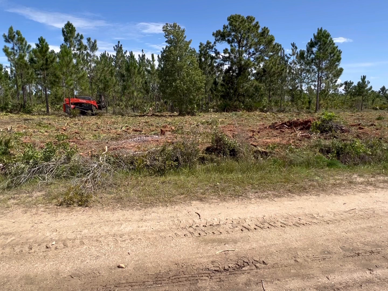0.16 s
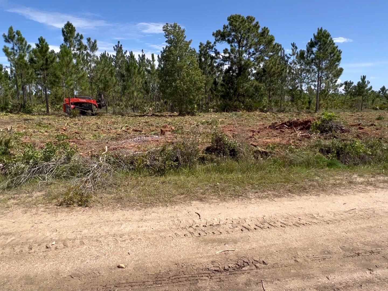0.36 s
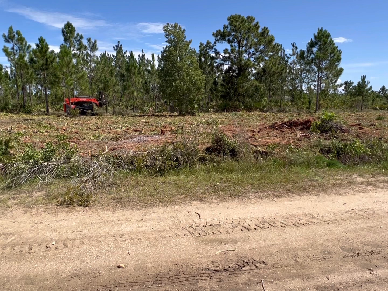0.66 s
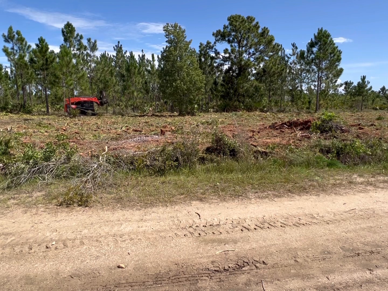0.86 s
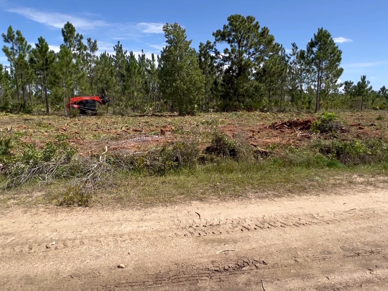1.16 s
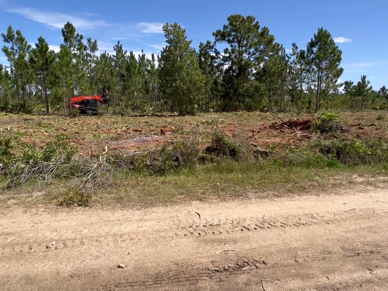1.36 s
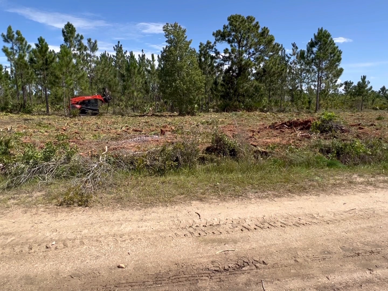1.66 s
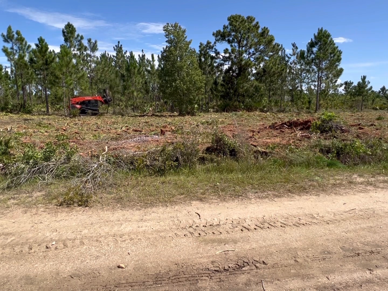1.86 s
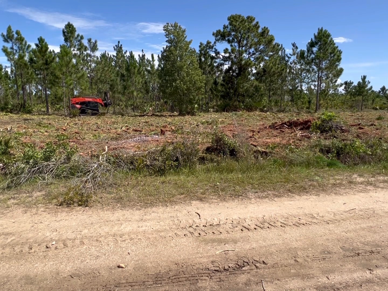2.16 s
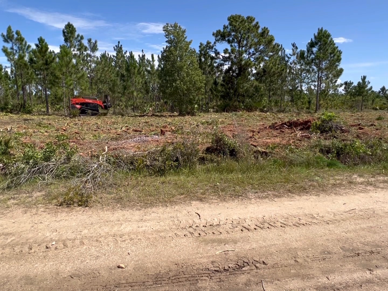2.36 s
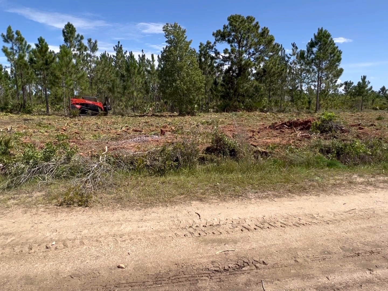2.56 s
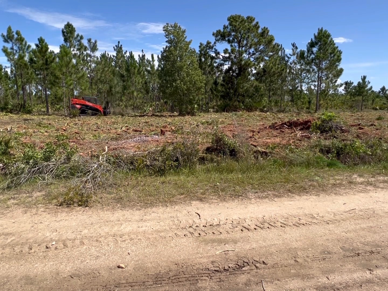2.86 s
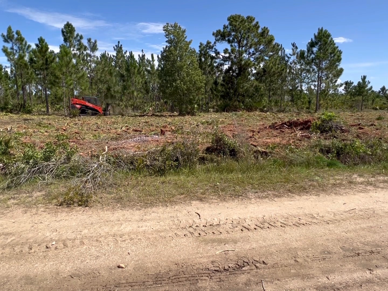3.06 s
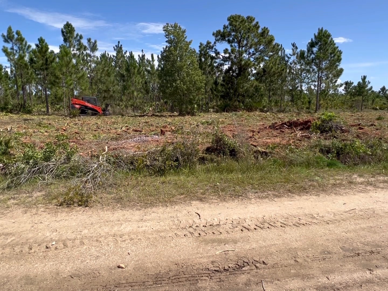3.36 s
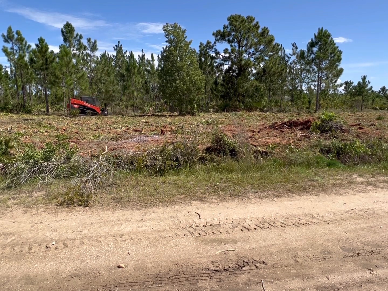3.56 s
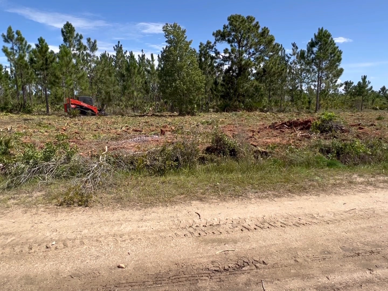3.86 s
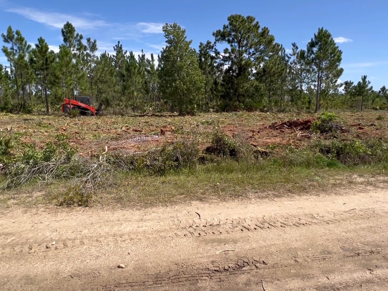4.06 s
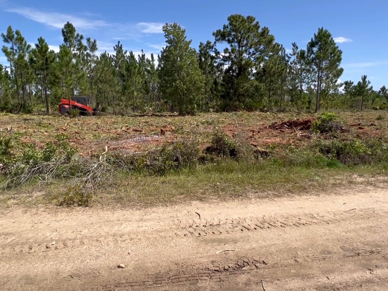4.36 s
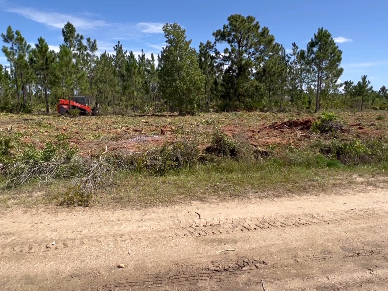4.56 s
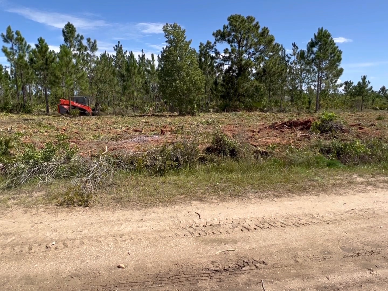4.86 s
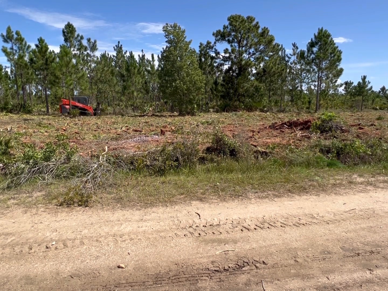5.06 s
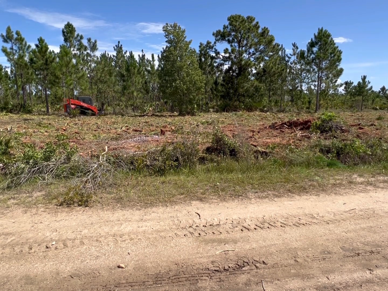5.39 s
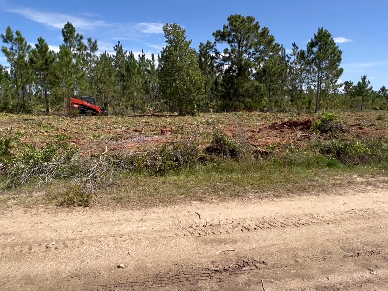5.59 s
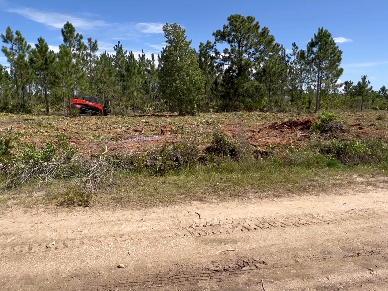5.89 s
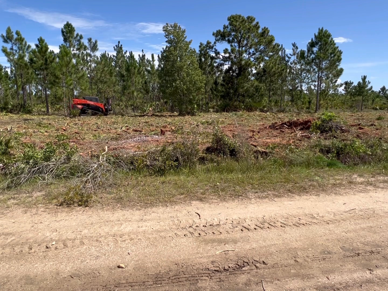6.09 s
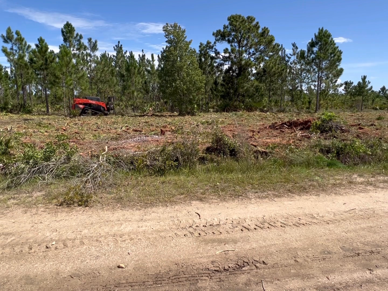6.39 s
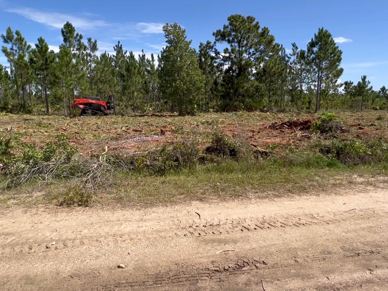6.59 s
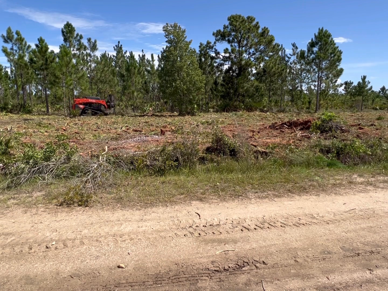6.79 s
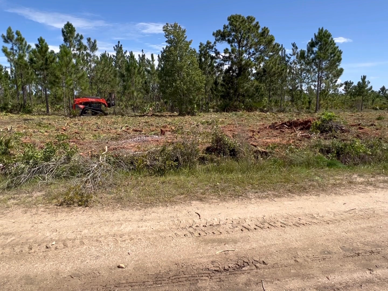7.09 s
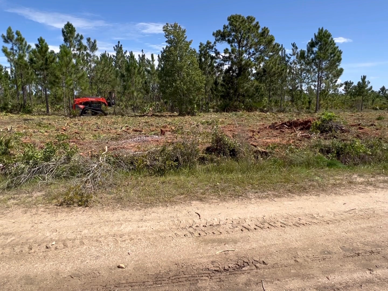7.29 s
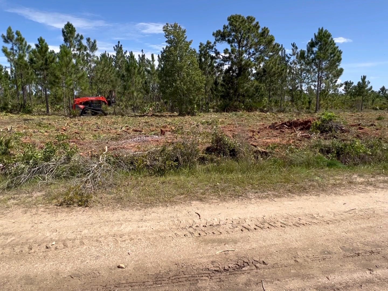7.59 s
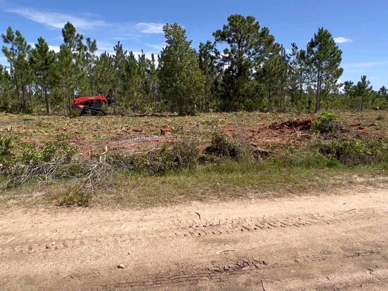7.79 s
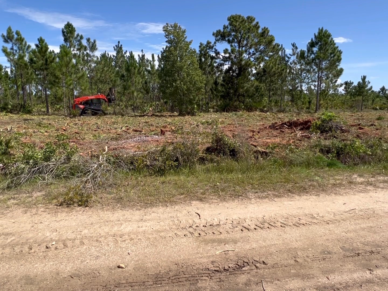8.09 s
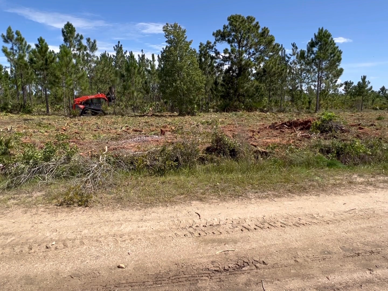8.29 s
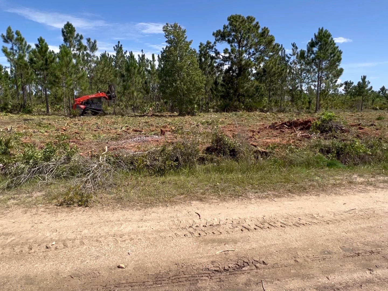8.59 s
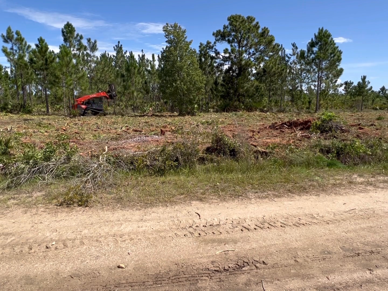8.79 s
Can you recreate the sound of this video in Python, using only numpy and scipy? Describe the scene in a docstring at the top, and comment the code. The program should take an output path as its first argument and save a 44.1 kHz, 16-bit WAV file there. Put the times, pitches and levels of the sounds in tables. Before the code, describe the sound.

A throbbing diesel drone continues throughout, heard from a distance in stereo. Brush crackles and knocks against a steel hood, building to a harsh tearing burst with brief howls, then falls back to a quieter engine with a wavering motor whine. Later, dull metallic track clanks and steady woody snaps resume. Low uneven wind gusts buffet the microphone in the first half, with few afterwards.

```python
"""Cleared lot: a tracked forestry mulcher works some way off to the left, heard at two microphone ports.
Diesel: tones at multiples of the firing rate over a throbbing noise drone. Drum: hum and howls on turn orders.
Brush: shaped noise for shredding, bursts for snaps. Tracks clank as decaying modes and squeak as narrow noise.
Fluttering tones make the whines and a low hum. Wind rumbles as low noise, mostly different at each port.
"""
import sys
import numpy as np
from scipy import signal
from scipy.fft import rfft, irfft
from scipy.io import wavfile
from scipy.ndimage import uniform_filter1d

SR = 44100
rng = np.random.default_rng(int(sys.argv[2]) if len(sys.argv) > 2 else 0)


def store_wav(level_fs):
    """Save 16-bit WAV to argv[1]."""
    pcm = np.round(np.clip(np.atleast_2d(level_fs), -1, 1) * 32767)
    wavfile.write(sys.argv[1], SR, pcm.T.astype(np.int16))


N = 394254
T = np.arange(N) / SR
HZ = np.fft.rfftfreq(N, 1 / SR)

# Engine: t/s, firing rate f/Hz, firing-tone level/dB
THROTTLE = [(0, 84.2, -42), (.7, 82.2, -36.5), (1.35, 82.3, -33), (1.6, 84.1, -33), (2.9, 83.7, -31),
            (3.4, 81, -40), (4.4, 77, -40), (5.1, 75.9, -65), (6.25, 81.8, -34.5), (7.2, 81.55, -31.5),
            (8.94, 81.6, -30)]
# Exhaust lines: multiple of firing rate, level/dB (firing tone itself at +2.5)
EXHAUST_ORDERS = [(.75, -7), (1, 2.5), (1.25, -12), (1.5, -9.5), (2, -12), (2.75, -18), (3.75, -32),
                  (4.75, -21.5)]


def diesel():
    """Exhaust tones at multiples of the four-cylinder firing rate."""
    firing_hz, level_db = curves(THROTTLE)
    tones = stack(firing_hz, EXHAUST_ORDERS, flutter=0.31, flutter_hz=9.1)
    return amp(level_db - 2.5) * tones  # offsets the +2.5 dB of order 1


# Exhaust and chassis roar spectrum: f/Hz, relative density/dB
DRONE_COLOUR = [(40, -42), (65, -1.5), (100, -2), (150, 1.5), (225, -1.5), (262, -8.5), (305, -14.5),
                (375, -14.5), (470, -21.5), (800, -17.5), (2000, -75)]
DRONE_DB, DRONE_SWELL_DB = -31, 2  # mean level, rms drift


def drone():
    """Rough low roar of exhaust and chassis, throbbing at the firing rate."""
    firing_hz = curves(THROTTLE)[0]
    throb = 1 + 0.54 * np.cos(2 * np.pi * np.cumsum(firing_hz) / SR)
    roar = unit(colour(hiss() * throb, DRONE_COLOUR))
    return amp(DRONE_DB + DRONE_SWELL_DB * wander(1.27)) * roar


# Drum, slowed by the ground: t/s, turning rate f/Hz
DRUM_SPEED = [(0, 38.4), (1.1, 37), (2.6, 37.6), (2.72, 37.1), (2.88, 36.3), (3.1, 36.1), (3.25, 31.3),
              (4.5, 32), (7, 38.4), (8.94, 37.8)]
# Drum hum lines: multiple of turning rate, level/dB relative to the hum
DRUM_ORDERS = [(3, -13), (6, -0.5), (8, -33), (10, -24)]
# Howls as teeth dig in: peak t/s, rise/s, fall/s, multiple of turning rate, level/dB
HOWLS = [(0.068, 0.17, 0.36, 6, -40), (2.71, .07, .19, 6, -23.5), (2.945, .1, .06, 6, -19.5),
         (3.09, .04, .06, 6, -30), (2.87, .24, .08, 7, -25.5), (3.045, .03, .03, 7, -30.5),
         (3.15, .03, .04, 7, -35.5)]
DRUM_HUM_DB, DRUM_DEEP_DB = -44, 3.5  # hum gain, gain added at full depth in soil


def drum():
    """Turn orders hum, louder in soil; two orders howl as the teeth dig in."""
    turns_hz = curves(DRUM_SPEED)[0]
    depth = curves(DEPTH)[0]
    hum = stack(turns_hz, DRUM_ORDERS, flutter=0.28, flutter_hz=2.7)
    out = amp(DRUM_HUM_DB + DRUM_DEEP_DB * depth) * hum
    for order in sorted({round(row[3]) for row in HOWLS}):
        level = sum(amp(db) * swell(s, rise, fall)
                    for s, rise, fall, k, db in HOWLS if round(k) == order)
        out += level * stack(turns_hz, [(order, 0)], flutter=0.07, flutter_hz=11)
    return out


# Chips on the hood, spectrum: f/Hz, relative density/dB
HOOD_COLOUR = [(200, -29), (380, -7.5), (480, -5.5), (650, -0.5), (800, -0.5), (950, -0.5), (1130, -1.5),
               (1400, -12), (2050, -8), (2500, -24), (4000, -79)]
# Wood grinding, spectrum: f/Hz, relative density/dB
GRIND_COLOUR = [(800, -16), (1300, -0.5), (1650, 2), (1970, 0.5), (2130, 2.5), (2320, 0), (2600, 0),
                (3000, -12.5), (4500, -62)]
# Brush tearing, spectrum: f/Hz, relative density/dB
SHRED_COLOUR = [(1500, -22), (2800, 5.5), (3500, 3), (4300, 1), (5200, -1), (6500, -4), (7600, -4.5),
                (10000, -28)]
# Chip spray, spectrum: f/Hz, relative density/dB
CHIP_COLOUR = [(3000, -20), (6000, -3), (7600, 0), (9000, -1.5), (10200, -6), (12000, -2), (13500, -6),
               (16000, -9)]
# Fine chips flying clear of the hood: t/s, level/dB before the feed drift
SPRAY = [(0, -67), (0.6, -61), (0.95, -50.5), (2.4, -45.5), (2.65, -38), (3.1, -42.5), (3.3, -45.5),
         (4.0, -53), (4.55, -54), (5.0, -63), (5.65, -55.5), (6.3, -68.5), (6.85, -54), (8.94, -53.5)]
# Hiss bursts as the head meets the ground: peak t/s, rise/s, fall/s, gain on the tearing/dB
SCRAPES = [(2.59, 0.13, 0.12, 4), (3.11, 0.25, 0.07, 1.8)]


def shredding():
    """Teeth tear brush once a turn; wood grinds, chips rattle the hood and spray out."""
    turns_hz = curves(DRUM_SPEED)[0]
    bite = 1 + 0.024 * np.cos(2 * np.pi * np.cumsum(turns_hz) / SR)
    hit_gain = amp(3.3 * np.minimum(rng.exponential(1, N), 4.5))
    hits = (rng.random(N) < 420 / SR) * hit_gain  # 420 hits/s
    grain_power = signal.lfilter([1], [1, -np.exp(-1 / (0.0034 * SR))], hits ** 2)
    grains = unit(np.sqrt(grain_power))

    rattle = hiss() * bite * (1 + 0.25 * grains)
    hood = unit(colour(rattle, HOOD_COLOUR)) + 0.32 * panels(rattle)
    hood = patchy(hood, depth_db=0.57, size=(2, 14))
    grind = colour(hiss() * bite * (1 + 0.11 * grains), GRIND_COLOUR)
    grind = patchy(grind, depth_db=1.5, size=(2, 12))
    shred = colour(hiss() * bite * (1 + 0.1 * grains), SHRED_COLOUR)
    shred = patchy(shred, depth_db=0.9, size=(9, 5))
    chips = unit(colour(hiss() * (1 + 0.96 * grains), CHIP_COLOUR))

    feed = amp(0.7 * wander(3.8))  # brush enters in clumps
    scrape = amp(sum(db * swell(s, rise, fall) for s, rise, fall, db in SCRAPES))
    clatter = effort(level_db=-32.5, per_load=0.7, deep_db=-4.5) * hood
    grinding = effort(level_db=-37, per_load=1.0, deep_db=2.2) * grind
    tearing = scrape * effort(level_db=-41, per_load=0.72, deep_db=1.8) * shred
    spray = amp(curves(SPRAY)[0]) * chips
    return clatter + grinding + feed * (tearing + spray)


# Steel hood panels: f/Hz, width/Hz, mean level/dB before normalising
HOOD_MODES = [(670, 13, -19), (810, 16, 1), (973, 34, -0.5), (1151, 27, 4), (1304, 29, 2.5), (1460, 40, -2)]
PANEL_SWING_DB, PANEL_SWING_HZ = 3.5, 2.1  # rms and rate of each panel's drift


def panels(rattle):
    """Hood panels take turns to ring as chips land on one or another; rms 1."""
    out = 0
    for hz, width_hz, db in HOOD_MODES:
        share = amp(db + PANEL_SWING_DB * wander(PANEL_SWING_HZ))
        out = out + share * np.sqrt(width_hz) * ring(rattle, [(hz, width_hz, 0)])
    return unit(out)


# Stem crack spectrum, also the swishes: f/Hz, relative density/dB
CRACK_COLOUR = [(1200, -18), (2050, 2), (2800, -9), (3700, -.5), (4250, -1), (5000, 1), (6600, -4),
                (7700, -20), (8800, -16), (12000, -19), (16000, -27)]
# Stem knock on the hood, spectrum: f/Hz, relative density/dB
KNOCK_COLOUR = [(250, -22), (480, -3), (720, 4), (1100, 0), (1450, -5), (2000, -.5), (2400, -6),
                (3000, -22), (6000, -40)]
# Bright dry ticks: t/s, relative level/dB
TICKS = [(0.26, -50), (0.716, -41), (0.8314, -41), (1.324, -34), (1.6532, -34), (1.665, -33),
         (2.8726, -30.5), (7.4104, -40.5), (7.466, -36)]
# Tick spectrum: f/Hz, relative density/dB
TICK_COLOUR = [(3000, -0.5), (8000, -3), (12000, -10), (16000, -2)]
# Brush swishing in the drum: peak t/s, rise/s, fall/s, level/dB
SWISHES = [(.28, .03, .08, -48), (.905, .03, .02, -44), (6.205, .012, .035, -46),
           (6.412, .006, .022, -44.5), (6.56, .05, .09, -51)]


def snapping():
    """Stems crack, splinter and knock on the hood; fine chips tick and brush swishes."""
    out = np.zeros((2, N))
    times, crack_db, knock_db = breaks()
    for s, db in zip(*splinters(times, crack_db)):
        crack = burst(CRACK_COLOUR, peak_s=.0012, tail_db=-13, tail_s=.013, spread_db=1.6)
        add(out, s, amp(db) * crack)
    for s, db in zip(times, knock_db):
        knock = burst(KNOCK_COLOUR, peak_s=.0018, tail_db=-9, tail_s=.016, spread_db=1.6)
        add(out, s, amp(db) * knock)
    tick = decays(*np.transpose(TICKS), fall_s=.0015, tail_db=-8, tail_s=0.014, rise_s=0.0001)
    ticks = amp(10.5) * colour(hiss() * tick, TICK_COLOUR)
    swish = sum(amp(db) * swell(s, rise, fall) for s, rise, fall, db in SWISHES)
    return out + ticks + swish * colour(hiss(), CRACK_COLOUR)


# Loud stem snaps, often in quick even runs: t/s, crack level/dB, hood knock level/dB
SNAPS = [(0.0355, -42.0, -38.0), (0.2029, -41.5, -44.0), (0.2598, -40.5, -43.0), (0.33, -42.5, -34.5),
         (0.717, -39.0, -42.5), (0.9507, -34.0, -33.0), (1.0245, -35.5, -28.5), (1.0989, -31.0, -26.5),
         (1.1737, -30.0, -28.5), (1.249, -26.5, -28.0), (1.3239, -26.5, -25.0), (1.3862, -31.0, -26.5),
         (1.4122, -35.5, -30.0), (1.4361, -36.5, -37.5), (1.4501, -29.0, -27.0), (1.475, -32.0, -29.0),
         (1.5109, -27.5, -31.0), (1.5525, -40.5, -33.0), (1.5618, -35.0, -33.5), (1.5873, -28.5, -29.0),
         (1.6531, -29.5, -37.5), (1.6605, -31.0, -26.5), (1.6665, -33.5, -29.5), (1.7145, -34.5, -32.0),
         (1.7399, -32.5, -26.5), (1.7639, -36.5, -26.0), (1.8407, -32.0, -24.5), (1.8475, -37.0, -29.5),
         (1.8911, -31.5, -28.5), (1.917, -28.0, -31.5), (1.9415, -30.0, -28.5), (1.9928, -29.0, -34.0),
         (2.0183, -29.0, -27.0), (2.0587, -38.0, -35.5), (2.0951, -36.0, -25.0), (2.1365, -35.0, -29.5),
         (2.1744, -36.0, -29.5), (2.3929, -34.5, -33.5), (2.4184, -35.5, -31.0), (2.4832, -34.5, -26.5),
         (6.2054, -45.0, -32.0), (6.6595, -43.0, -36.5), (6.7423, -43.0, -43.5), (6.7698, -35.5, -32.0),
         (6.8526, -41.5, -37.5), (6.8805, -43.0, -33.0), (6.9074, -38.0, -31.5), (6.9628, -36.0, -38.5),
         (7.0187, -39.0, -33.5), (7.0741, -35.0, -30.0), (7.1299, -35.0, -31.5), (7.1853, -33.0, -32.0),
         (7.2417, -27.5, -27.0), (7.2976, -34.5, -33.0), (7.3534, -31.5, -34.0), (7.4103, -31.5, -30.5),
         (7.4657, -32.0, -30.0), (7.5245, -40.5, -40.0), (7.551, -38.0, -32.5), (7.6363, -33.5, -24.0),
         (7.7216, -36.0, -24.5), (7.753, -40.5, -36.0), (7.8064, -38.0, -35.0), (7.8967, -38.5, -37.0),
         (7.9491, -37.0, -29.0), (8.0633, -37.0, -41.0), (8.2065, -38.0, -41.5), (8.3502, -38.0, -33.5),
         (8.4375, -40.5, -28.5), (8.5213, -40.0, -30.5), (8.6096, -37.5, -28.5), (8.6844, -38.5, -34.5),
         (8.7554, -40.5, -33.0), (8.8136, -38.5, -39.5)]
TWIGS_PER_S, TWIG_DB, TWIG_SPREAD_DB = 26, -42, 1.5  # at working load, head above soil
TWIG_KNOCK_DB = 9  # relative to the crack
IDLE_LOAD_DB = -48.5  # no twigs break below this


def breaks():
    """All breaks as (t/s, crack/dB, knock/dB): loud snaps plus random twigs that thicken with load."""
    load_db = curves(LOAD)[0] - WORKING_LOAD_DB
    clear = np.clip(1 - curves(DEPTH)[0], 0, 1) ** 2
    rate_hz = TWIGS_PER_S * (1 + load_db / (WORKING_LOAD_DB - IDLE_LOAD_DB)) * clear
    twig = rng.random(N) < rate_hz / SR
    twig_db = TWIG_DB + 0.5 * load_db + TWIG_SPREAD_DB * rng.standard_normal(N)
    twig_db = twig_db[twig]
    twigs = zip(T[twig], twig_db, twig_db + TWIG_KNOCK_DB)
    return np.transpose(list(SNAPS) + list(twigs))


SPLINTER_GAP_S, SPLINTER_DB, SPLINTER_SPREAD_DB = .006, -13, 4  # mean gap, offset, spread scale


def splinters(s, crack_db):
    """Each crack sets off two, 9 to 16 dB weaker, as the last fibres part; all as (t/s, level/dB)."""
    delays_s = np.cumsum(rng.exponential(SPLINTER_GAP_S, size=(len(s), 2)), axis=1)
    spread_db = SPLINTER_SPREAD_DB * rng.uniform(-0.69, 1, delays_s.shape)
    levels_db = crack_db[:, None] + SPLINTER_DB + spread_db
    return np.append(s, s[:, None] + delays_s), np.append(crack_db, levels_db)


# Drum load, wood being chewed: t/s, load level/dB
LOAD = [(0, -50), (0.7, -48), (1.05, -43), (1.45, -40), (1.8, -40.5), (2.15, -36.5), (2.42, -38),
        (2.75, -31.5), (3.05, -34.5), (3.27, -42.5), (3.55, -44.5), (4.0, -51.5), (5.3, -51), (6.45, -51),
        (7.3, -41.5), (8.15, -44.5), (8.94, -43)]
# Head in the soil: t/s, depth (0-1)
DEPTH = [(2.35, 0), (2.9, 0.96), (3.6, 0.92), (5, 0.7), (6.2, 0.05)]
WORKING_LOAD_DB = -40.5


def effort(level_db, per_load, deep_db):
    """Gain following load (dB per dB about working load) and soil depth (dB at full depth)."""
    load_db = curves(LOAD)[0] - WORKING_LOAD_DB
    return amp(level_db + per_load * load_db + deep_db * curves(DEPTH)[0])


# Track link drops: t/s, relative level/dB
CLANKS = [(6.205, -39), (6.435, -39.5), (6.604, -40), (6.768, -42), (6.876, -39), (7.047, -40),
          (7.215, -39), (8.143, -42.5), (8.47, -42), (8.522, -39), (8.78, -42.5)]
# Link modes: f/Hz, relative level/dB, t60/s
LINK_MODES = [(670, -18, 0.16), (1052, -19, 0.085), (1120, 5, 0.26), (1320, -3.5, 0.27), (1690, -3.5, 0.21)]


def tracks():
    """Steel links drop onto rollers: decaying modes, detuned per drop, with a chattering level."""
    out, t = np.zeros(N), np.arange(SR // 3) / SR
    for s, db in CLANKS:
        clank = 0
        for hz, mode_db, t60_s in LINK_MODES:
            decay = amp(db + 3.5 + mode_db - 60 * t / t60_s)
            cycles = hz * rng.normal(1, 0.0085) * t + rng.random()
            clank = clank + decay * np.sin(2 * np.pi * cycles)
        part = out[round(s * SR):][:len(t)]
        part += (clank * (1 - np.exp(-t / 0.0013)))[:len(part)]
    return out * unit(1 + 0.6 * wander(45))


# Thin high squeaks: t/s, level/dB, length/s
SQUEAKS = [(1.66, -52, .07), (1.95, -54, .08), (2.45, -50, .06), (5.65, -63, .3), (6.43, -47, .13),
           (7.46, -55, .1)]
# Squeak resonance, first row; the other rows are too weak to hear: f/Hz, width/Hz, relative level/dB
SQUEAK_MODES = [(12650, 290, 32), (12900, 140, -24), (14600, 130, -44)]


def squeaks():
    """Thin, very high squeaks: noise in one narrow resonance near 12.65 kHz."""
    level = 0
    for s, db, length_s in SQUEAKS:
        progress = np.clip((T - s) / length_s, 0, 1)
        level = level + amp(db) * np.sin(np.pi * np.sqrt(progress))
    return level * ring(hiss(), SQUEAK_MODES)


# Drive motor, singing as the machine turns: t/s, f/Hz, level/dB before flutter
DRIVE_MOTOR = [(3.9, 655, -62), (4.2, 664, -50), (4.43, 688, -47.5), (4.62, 716, -46.5), (4.8, 723, -46),
               (4.97, 703, -42), (5.17, 668, -47), (5.36, 665, -48.5), (5.5, 675, -54), (6.05, 702, -49),
               (6.25, 700, -73)]
# Steady or gliding whines, and a low hum near 1.75 times the firing rate:
# peak t/s, rise/s, fall/s, f/Hz at peak, glide/(Hz/s), level/dB before flutter
WHINES = [(3.0, .35, .6, 2135, -40, -41), (1.25, 0.39, .4, 371.6, 0, -47), (5.78, .18, .2, 363, 70, -44),
          (6.6, .4, .4, 374, 0, -50), (7.0, .25, .7, 143.5, -3.5, -36), (8.9, 0.54, .3, 379, -5.5, -47)]
DRIVE_FLUTTER, WHINE_FLUTTER = .48, .7


def whines_and_hum():
    """Fluttering tones: the drive motor sings, steady or gliding whines and a low hum swell and fade."""
    paths = np.array([wander(30) + 1j * wander(28) for path in range(2)])
    motor_hz, motor_db = curves(DRIVE_MOTOR)
    out = amp(motor_db) * whine(motor_hz, DRIVE_FLUTTER * paths)
    for s, rise, fall, hz, glide_hz_per_s, db in WHINES:
        tone = whine(hz + glide_hz_per_s * (T - s), WHINE_FLUTTER * paths)
        out += amp(db) * swell(s, rise, fall) * tone
    return out


# Thin squeal: peak t/s, rise/s, fall/s, f/Hz, level/dB
SQUEAL = (4.43, .22, .12, 2770, -56.5)


def squeal():
    """One faint fluttering tone, alike at both ports, swells and fades as the machine turns."""
    s, rise, fall, hz, db = SQUEAL
    tone = stack(np.full(N, hz), [(1, 0)], flutter=0.45, flutter_hz=14)
    return amp(db) * swell(s, rise, fall) * tone


# Wind rumble spectrum: f/Hz, relative density/dB
WIND_COLOUR = [(15, -45), (26, -20), (38, 0.5), (62, -0.5), (95, 1), (150, -10.5), (250, -14), (400, -25),
               (900, -93)]
# Breeze under the gusts: t/s, level/dB before the lumpy drift
BREEZE = [(0, -38.5), (2.2, -36), (4.45, -33), (4.9, -41), (5.4, -51), (6.8, -38), (8.94, -48)]
# Gusts: peak t/s, level/dB before the lumpy drift, half length/s
GUSTS = [(1.431, -31.5, 0.21), (2.264, -25, 0.22), (3.195, -33.5, 0.6), (3.774, -34, 0.091),
         (4.308, -26, 0.32), (7.1, -30, 0.11), (8.518, -28, .07)]
# Buffets: t/s, peak level/dB
BUFFETS = [(1.44, -24), (2.265, -14.5)]
BUFFET_HZ, BUFFET_S = 80, .014  # tone, half length


def wind():
    """Lumpy rumble, mostly different per port: breeze, gusts and buffets that reach both."""
    rumble = unit(colour(hiss() + 0.18 * rng.standard_normal(N), WIND_COLOUR))
    power = amp(curves(BREEZE)[0]) ** 2
    for s, db, half_s in GUSTS:
        power = power + (amp(db) * swell(s, half_s, half_s)) ** 2
    out = np.sqrt(power) * amp(1.9 * wander(4.6)) * rumble
    for s, db in BUFFETS:
        thump = swell(s, BUFFET_S, BUFFET_S) * np.cos(2 * np.pi * BUFFET_HZ * (T - s))
        out += amp(db) * thump
    return out


# Machine phase at the ports: f/Hz, lead of left/rad
LEAD = [(20, -0.5), (250, 0.1), (650, 1.55), (2100, 2.4), (2900, 3.4), (4500, 5.6), (6600, 7.7), (9000, 11),
        (12000, 13.2), (16000, 18.5)]
# Machine noise shared by the ports: f/Hz, likeness (0-1)
LIKENESS = [(60, .2), (140, .6), (260, .78), (800, .88), (1600, .74), (2400, .76), (4200, .45), (6500, .5),
            (8000, .65), (12000, .85)]
# Machine level at the ports: f/Hz, left minus right level/dB
TILT = [(330, -1.5), (500, -0.5), (770, 5), (1170, 4), (1790, 0), (2740, 0.5), (4190, 3.5), (6410, 6),
        (9000, 3), (15000, -2)]


def ports(tones, noises):
    """Machine at the ports: left mostly leads and is mostly louder; noise arrives partly scattered."""
    direct, (first, second) = rfft(tones), rfft(noises)
    same, tilt_db = np.clip(over_hz(LIKENESS), 0, 1), over_hz(TILT)
    left = (direct + first) * amp(tilt_db / 2)
    scattered = same * first + np.sqrt(1 - same ** 2) * second
    right = (direct + scattered) * amp(-tilt_db / 2) * np.exp(-1j * over_hz(LEAD))
    return irfft(np.array([left, right]), N)


def amp(db):
    """Decibels to gain."""
    return 10 ** (np.asarray(db) / 20)


def unit(x):
    """Scales to rms 1."""
    return x / np.sqrt(np.mean(x ** 2) + 1e-20)


def curves(rows):
    """Each column of a timed table at every sample."""
    s, *columns = np.transpose(rows)
    return [np.interp(T, s, c) for c in columns]


def over_hz(points, hz=HZ):
    """Reads a table on a logarithmic frequency axis."""
    f, value = np.transpose(points)
    return np.interp(np.log(hz + 1), np.log(f + 1), value)


def colour(x, points):
    """Filters by a spectrum; white noise keeps its power."""
    return irfft(rfft(x) * unit(amp(over_hz(points))), N)


def wander(rate_hz):
    """Random drift below about rate_hz; rms 1."""
    return unit(irfft(rfft(rng.standard_normal(N)) / (1 + (HZ / rate_hz) ** 4), N))


def hiss():
    """Two unrelated white noises."""
    return rng.standard_normal((2, N))


def swell(peak_s, rise_s, fall_s):
    """Smooth rise to 1 and smooth fall."""
    return np.exp(-((T - peak_s) / np.where(T < peak_s, rise_s, fall_s)) ** 2)


def patchy(x, depth_db, size):
    """Random patches in time and frequency come and go; rms 1."""
    z = signal.stft(x, nperseg=512)[2]
    field = uniform_filter1d(rng.standard_normal(z.shape[1:]), size[0], axis=0)
    field = unit(uniform_filter1d(field, size[1], axis=1))
    return unit(signal.istft(z * amp(depth_db * field), nperseg=512)[1][:, :N])


def stack(rate_hz, orders, flutter, flutter_hz):
    """Multiples of a rate, each fluttering in strength and phase on its way through the air."""
    angle = 2 * np.pi * np.cumsum(rate_hz) / SR
    starts = rng.uniform(0, 2 * np.pi, len(orders))
    lines = 0
    for (k, db), start in zip(orders, starts):
        in_phase = (1 + flutter * wander(flutter_hz)) * np.cos(k * angle + start)
        quadrature = flutter * wander(flutter_hz) * np.sin(k * angle + start)
        lines = lines + amp(db) * (in_phase + quadrature)
    return lines * np.sqrt(2 / (1 + 2 * flutter ** 2))  # rms 1 for a 0 dB line


def whine(hz, flutter):
    """A tone heard over two fluttering paths."""
    cycles = np.cumsum(hz) / SR + rng.random()
    return ((1 + flutter) * np.exp(2j * np.pi * cycles)).real


def ring(x, modes):
    """Passes x through narrow resonances; rms 1."""
    response = sum(amp(db) / (1 + ((HZ - hz) / (width / 2)) ** 2) for hz, width, db in modes)
    return unit(irfft(rfft(x) * response, N))


def decays(times, levels_db, fall_s, tail_db, tail_s, rise_s):
    """Envelope of sharp bursts, each with its scatter off ground and brush."""
    t, power = np.arange(SR // 5) / SR, np.zeros(N)
    fall = np.exp(-2 * t / fall_s) + amp(tail_db) ** 2 * np.exp(-2 * t / tail_s)
    shape = (1 - np.exp(-t / rise_s)) ** 2 * fall
    for s, db in zip(times, levels_db):
        part = power[max(round(s * SR), 0):][:len(t)]
        part += amp(db) ** 2 * shape[:len(part)]
    return np.sqrt(power)


def add(mix, s, sound):
    """Mixes a sound in at a time."""
    part = mix[:, round(s * SR):][:, :sound.shape[1]]
    part += sound[:, :part.shape[1]]


BURST_S = .006  # opening that sets a burst's level


def burst(spectrum, peak_s, tail_db, tail_s, spread_db, size=4096):
    """Sharp noise burst of its own colour plus scatter off ground and brush; opening rms 1."""
    t, hz = np.arange(size) / SR, abs(np.fft.fftfreq(size, 1 / SR))
    shape = (t / peak_s * np.exp(1 - t / peak_s)) ** 2
    shape += amp(tail_db) * np.exp(-t / tail_s) * (t > peak_s)
    own = [(f, db + spread_db * rng.standard_normal()) for f, db in spectrum]
    log_gain = np.log(amp(over_hz(own, hz)))
    causal = np.exp(np.conj(signal.hilbert(log_gain)))  # minimum phase
    noise = shape * rng.standard_normal((2, size))
    x = np.fft.ifft(np.fft.fft(noise) * causal).real
    return x / np.std(x[:, t < BURST_S])


def scene():
    """The machine across the lot, and wind at the microphone."""
    tones = diesel() + drum() + tracks()
    noises = drone() + shredding() + snapping() + squeaks() + whines_and_hum()
    return ports(tones, noises) + squeal() + wind()


EDGE_HZ = 15950


def record(dry):
    """The recorder's band limit: linear-phase low-pass."""
    lowpass = signal.firwin(511, EDGE_HZ, window=("kaiser", 9), fs=SR)
    return signal.oaconvolve(dry, lowpass[None], "same", axes=1)


dry = scene()
out = record(dry)
store_wav(out)
```